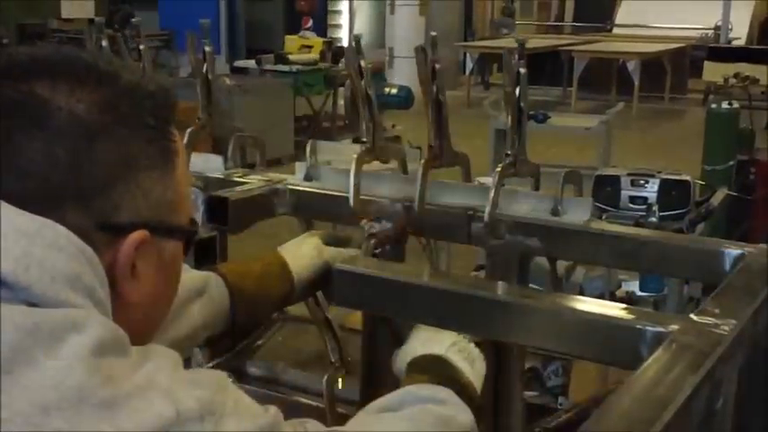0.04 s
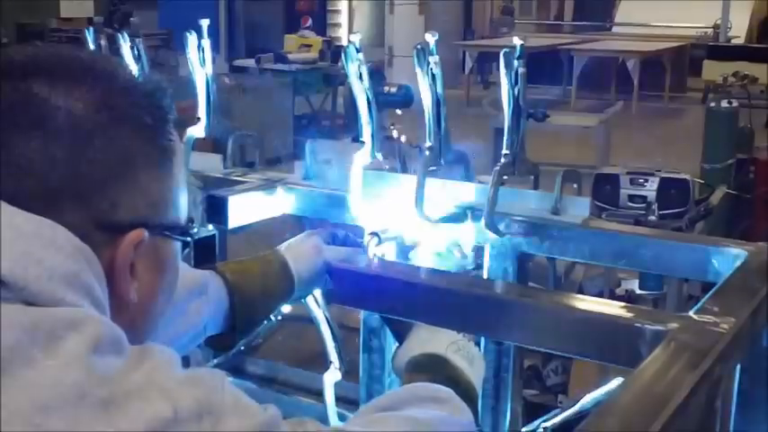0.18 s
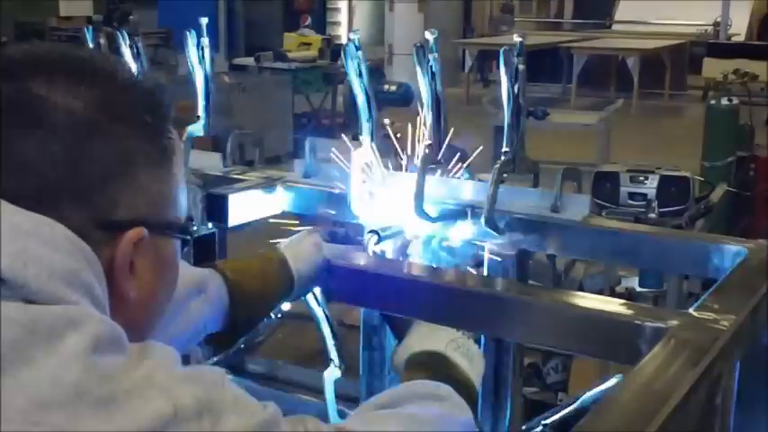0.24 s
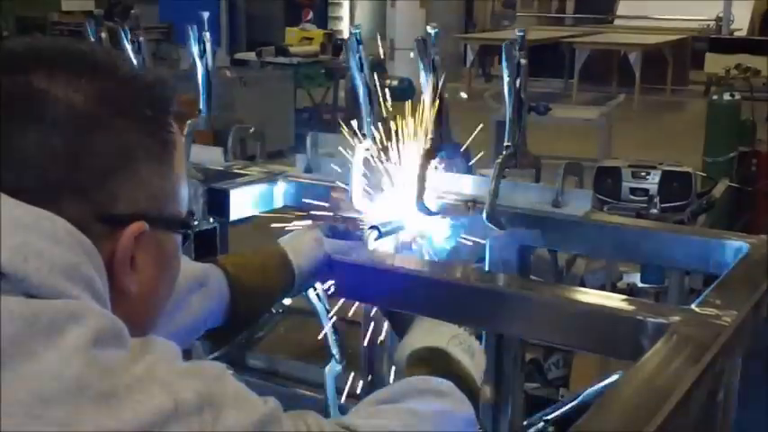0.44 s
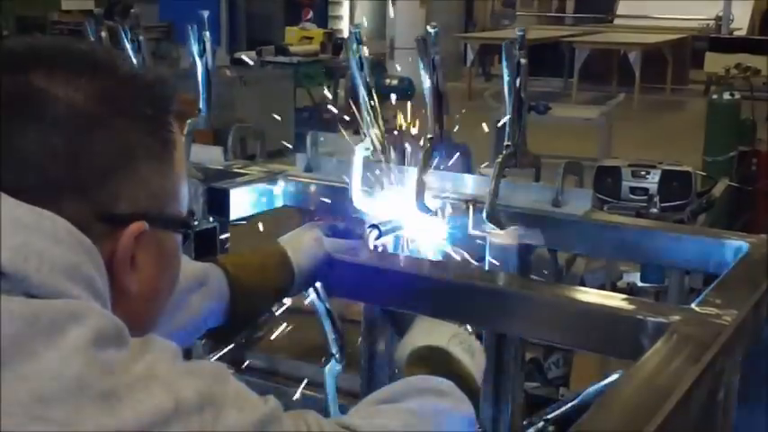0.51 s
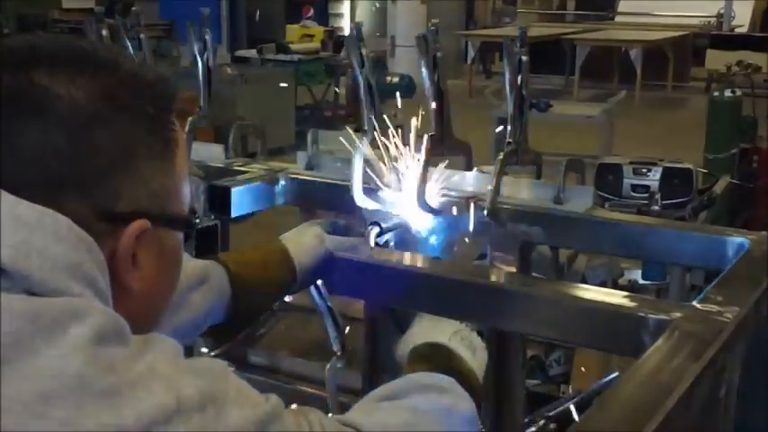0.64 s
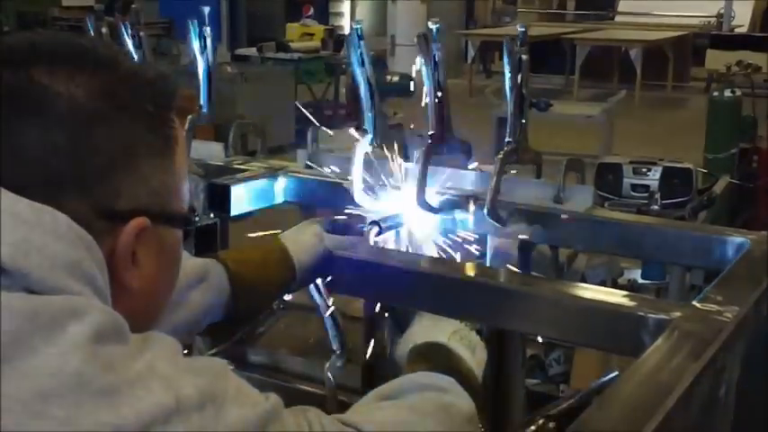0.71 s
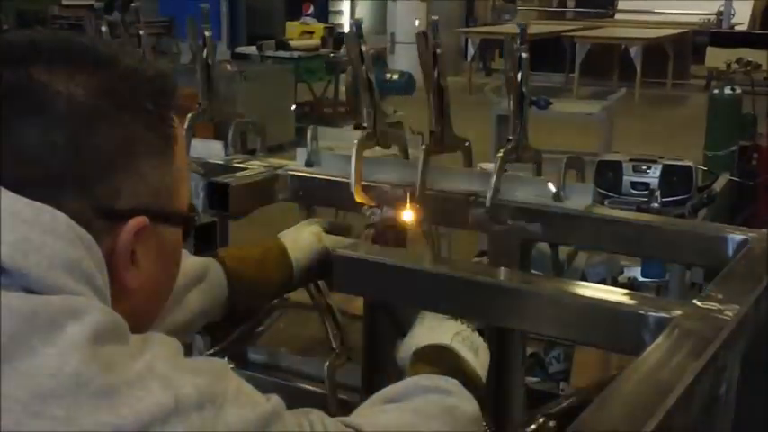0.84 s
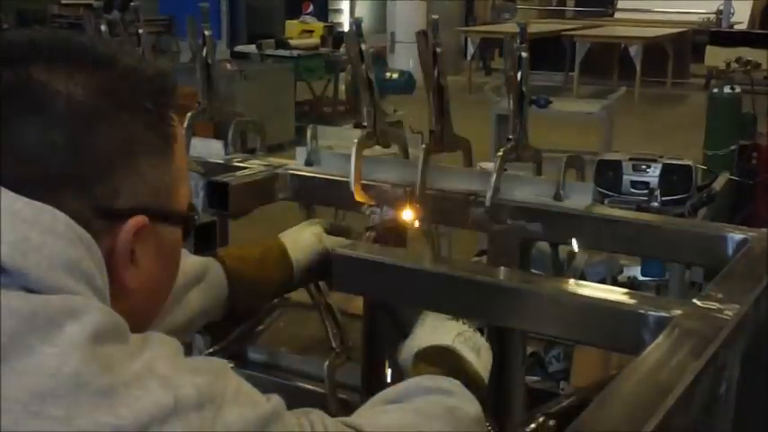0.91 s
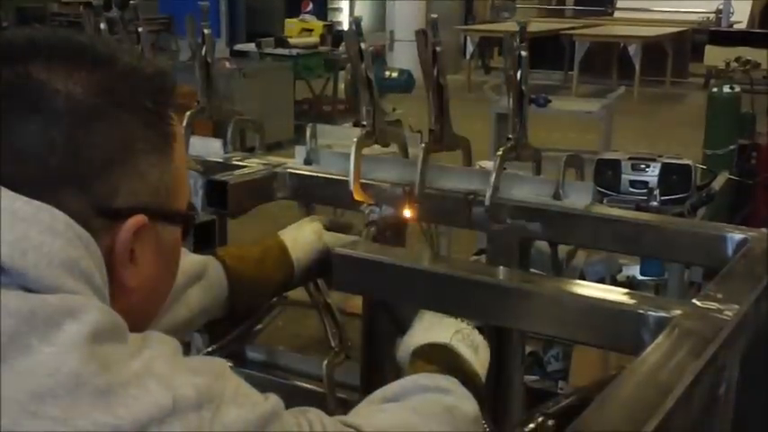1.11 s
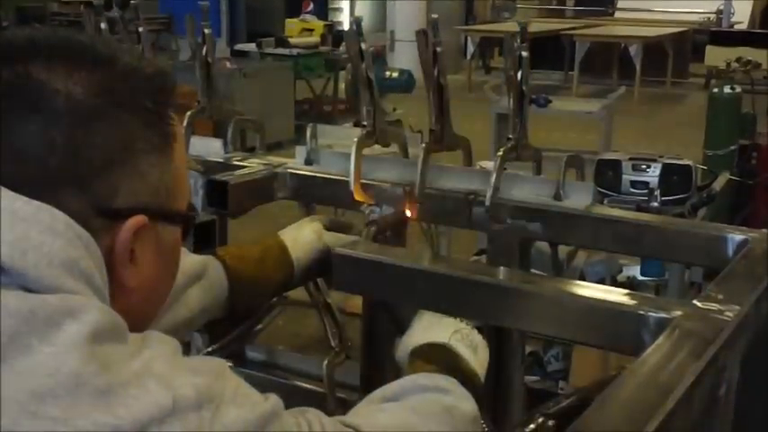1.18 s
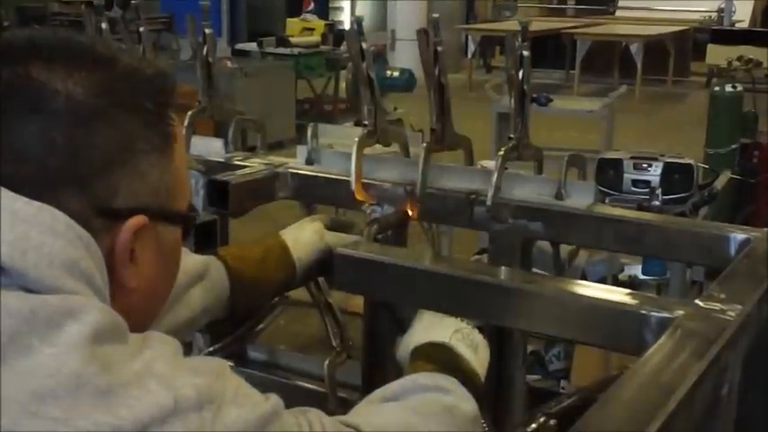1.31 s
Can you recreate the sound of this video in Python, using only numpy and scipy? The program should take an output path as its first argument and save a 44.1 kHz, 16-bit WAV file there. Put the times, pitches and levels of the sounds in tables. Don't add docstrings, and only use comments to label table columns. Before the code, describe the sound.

Close, harsh electric welding crackle with sharp snaps, fizzing droplets and dull metallic knocks from a steel frame; distant machinery drones before and after, with low transformer hum and a light hall echo.

```python
import sys
import numpy as np
from scipy import signal
from scipy.fft import irfft
from scipy.io import wavfile
from scipy.ndimage import uniform_filter1d

SR = 44100
rng = np.random.default_rng(int(sys.argv[2]) if len(sys.argv) > 2 else 0)


def volts_from_decibels(level):
    exponent = np.asarray(level, float) / 20
    return 10 ** exponent


def generate_wav(sig):
    pcm = np.round(np.clip(np.atleast_2d(sig).T, -1, 1) * 32767).astype(np.int16)
    wavfile.write(sys.argv[1], SR, pcm)


N = 59535


def evened(x):
    return x / np.sqrt(np.mean(x ** 2) + 1e-20)


def read(points, hz):
    f, value = np.transpose(points)
    return np.interp(np.log(hz + 1), np.log(f + 1), value)


def causal(db):
    log = np.log(volts_from_decibels(np.maximum(db, -100)))
    spectrum = np.exp(np.conj(signal.hilbert(np.r_[log, log[-2:0:-1]])))
    return np.fft.ifft(spectrum).real[:2048]


def rings(modes):
    t = np.arange(8000) / SR
    return sum(volts_from_decibels(db - 60 * t / t60) * np.sin(2 * np.pi * hz * t) for hz, db, t60 in modes)


def spikes(s, db):
    return np.bincount(np.round(s * SR).astype(int), volts_from_decibels(db), N)[:N]


def drone():
    # pitch_hz, level_db (per Hz)
    drone_colour = [(25, -11.5), (110, -6), (500, -8.5), (850, -5), (1400, -11.5), (1900, -18.5),
                    (3500, -23), (10400, -46)]
    # pitch_hz, width_hz, level_db
    favoured_bands = [(840, 41, 4), (1380, 54, 1.5), (2740, 140, 4.5)]
    # time_s, level_db
    machine_swell = [
        (0, -2.5),
        (.15, -0.5),
        (.3, 3.5),
        (.5, 2),
        (.9, -2.5),
        (1.15, -2),
        (1.3, 0),
        (1.35, 1.5),
    ]
    drone_db, patchy_db = -38.5, 1.5
    hz = np.fft.rfftfreq(1024, 1 / SR)
    real, imag, patches = rng.standard_normal((N // 256 + 5, 513, 3)).T
    patches = uniform_filter1d(patches, size=8, axis=0)
    patches = evened(uniform_filter1d(patches, size=10, axis=1))
    bands = sum(db * np.exp(-((hz - top_hz) / width) ** 2) for top_hz, width, db in favoured_bands)
    level_db = (read(drone_colour, hz) + bands)[:, None] + patchy_db * patches
    noise = signal.istft((real + 1j * imag) * volts_from_decibels(level_db), nperseg=1024, noverlap=768)[1][:N]
    swell_db = np.interp(np.arange(N) / SR, *np.transpose(machine_swell))
    return volts_from_decibels(drone_db + swell_db) * evened(noise)


def hum():
    # time_s, level_db
    hum_level = [(0, -53.5), (.2, -49.5), (.235, -48.5), (.27, -46), (.38, -46), (.43, -72), (.49, -45),
                 (.55, -75), (.87, -58), (.96, -53), (1.35, -52)]
    hum_hz, width_hz = 120.2, 9.4
    t = np.arange(N) / SR
    pole = np.exp(-np.pi * width_hz / SR)
    waver = signal.lfilter([1], [1, -pole], rng.standard_normal(N) + 1j * rng.standard_normal(N))
    tone = ((2.4 + waver / np.std(waver)) * np.exp(2j * np.pi * hum_hz * t)).real
    return volts_from_decibels(np.interp(t, *np.transpose(hum_level))) * evened(tone)


def hall(x):
    # pitch_hz, t60_s
    hall_decay = [(200, 0.86), (1000, 0.2), (4000, 0.76), (10000, 0.49)]
    taps = np.zeros(SR)
    at = np.arange(260, SR - 20, 20)
    taps[at + rng.integers(0, 20, len(at))] = rng.choice([-1., 1.], len(at))
    hz, t, z = signal.stft(taps, SR, nperseg=256)
    decay_db = -60 * t / read(hall_decay, hz)[:, None]
    tail = signal.istft(z * volts_from_decibels(decay_db), SR, nperseg=256)[1]
    return signal.fftconvolve(x, tail / np.linalg.norm(tail))[:N]


def stubs():
    # start_s, pitch_hz, level_db, t60_s
    knocks = [
        (.236, 213, -30, 0.067),
        (.238, 121, -29.5, 0.13),
        (.377, 557, -16.5, 0.037),
        (.377, 1055, -19, 0.029),
        (.49, 106, -34.5, 0.11),
        (.531, 503, -28, 0.038),
    ]
    out = np.zeros(N)
    for start, hz, db, t60 in knocks:
        hit = spikes(np.array([start]), [0])
        out += signal.oaconvolve(hit, rings([(hz, db, t60)]))[:N]
    return out


def bounces():
    # delay_ms, pressure_share
    reflections = [(0, 1), (.17, .55), (.32, .35), (.42, -.3), (.51, -.4), (.71, -.3), (.98, .4),
                   (1.13, .3), (1.28, .5), (1.37, -.35), (1.61, -.5), (2.52, .3), (2.93, -.2), (4.3, -.2)]
    ms, share = np.transpose(reflections)
    delayed = np.sinc(np.arange(400) - ms[:, None] * SR / 1000)
    return (share[:, None] * delayed).sum(0)


def thump():
    # pitch_hz, level_db, t60_s
    tube_modes = [(259, -4.5, 0.058), (580.5, 2.5, 0.08), (831.2, 5, 0.11), (926, -4.5, 0.19),
                  (1115, -41, 0.066), (126, -5, 0.049)]
    # pitch_hz, level_db
    push_colour = [(60, -10), (200, 5), (600, -2), (1100, -3.5), (1700, 1), (2600, -1.5), (4000, -52)]
    thump_db, ring_db, rise_s, from_hz = 1, -11.5, 0.0016, 157
    push = signal.oaconvolve(bounces(), causal(read(push_colour, np.fft.rfftfreq(4096, 1 / SR))))
    out = volts_from_decibels(ring_db) * rings(tube_modes)
    out *= 1 - np.exp(-np.arange(len(out)) / SR / rise_s)
    out[:len(push)] += push / np.sqrt(np.mean(push[:130] ** 2))
    return volts_from_decibels(thump_db) * signal.sosfilt(signal.butter(2, from_hz, "high", fs=SR, output="sos"), out)


def snap():
    # pitch_hz, level_db, t60_s
    steel_modes = [(3270, -35, 0.038), (3860, -49, 0.077), (4658, -23, 0.0094), (5260, -45, 0.045),
                   (6060, -29, 0.013), (7154, -19, 0.017), (7450, -20.5, 0.01), (8455, -28, 0.017),
                   (10210, -11.5, 0.0059)]
    # pitch_hz, level_db
    spike_colour = [(300, -27), (1500, -11.5), (2400, -21.5), (3300, -2.5), (5000, 0), (7200, -3),
                    (9000, 3.5), (10300, -1)]
    snap_db = 3
    out = rings(steel_modes)
    out[:400] += bounces()
    spike = irfft(volts_from_decibels(read(spike_colour, np.fft.rfftfreq(4096, 1 / SR))))
    spike = np.roll(spike, 64)[:129] * np.hanning(129)
    out = signal.oaconvolve(out, spike)
    return volts_from_decibels(snap_db) * out / np.sqrt(np.mean(out[64:154] ** 2))


def sputter():
    # time_s, level_db
    arc_current = [(.231, -94), (0.236, -36.5), (.26, -50), (.355, -51), (0.371, -35.5), (0.421, -36.5),
                   (.44, -82), (0.461, -61), (0.47, -29), (.495, -49), (.515, -42), (.535, -33.5),
                   (.64, -46), (.75, -37.5), (0.799, -37.5), (0.864, -39), (.878, -64), (.97, -82)]
    pops_per_s, spread_db, hiss_db = 2500, 3, -10.5
    size_db = spread_db * np.minimum(rng.exponential(1, N), 4)
    small = evened(volts_from_decibels(size_db) * (rng.random(N) < pops_per_s / SR))
    small = small + volts_from_decibels(hiss_db) * rng.standard_normal(N)
    current = volts_from_decibels(np.interp(np.arange(N) / SR, *np.transpose(arc_current)))
    return current * (small - small.mean()) / 10


def droplets():
    # start_s, length_s, level_db
    fizzing = [
        (0.3684, 0.0063, -26),
        (.386, 0.0016, -36),
        (0.4698, 0.013, -25),
        (0.4814, .004, -31),
        (0.491, 0.0017, -25),
        (0.631, 0.0027, -35),
        (0.825, 0.0032, -35.5),
        (.844, .003, -34),
    ]
    t = np.arange(N) / SR
    swell = sum(volts_from_decibels(db - 19) * np.sin(np.pi * np.clip((t - start) / length, 0, 1))
                for start, length, db in fizzing)
    return swell * rng.standard_normal(N)


def puffs(s, db):
    scatter_db, scatter_t60, lag_s = -8, .016, .0012
    decay = volts_from_decibels(-60 / scatter_t60 / SR)
    puff = signal.lfilter([1], [1, -decay], spikes(s + lag_s, db + scatter_db - 20))
    return puff * rng.standard_normal(N)


def arc():
    # start_s, snap_db, thump_db (re snap)
    arc_pops = [(0.2331, -23, -6), (0.3764, -13, -2), (0.3864, -28, -11), (0.4006, -15, -10),
                (0.4106, -20, -5), (0.4631, -25, -14), (0.4717, -22, -5), (0.4777, -26, -5),
                (0.4889, -23, -2), (0.529, -15, -9), (0.5417, -23, -3), (0.5566, -19, -9),
                (0.5684, -29, -6), (0.5772, -33, 5), (0.5855, -20, -12), (0.595, -30, -5),
                (0.6025, -28, -1), (0.6117, -22, -12), (0.6204, -33, 0), (0.6275, -31, -2),
                (0.6346, -31, -1), (0.6508, -25, -11),
                (0.6608, -30, -1), (0.6757, -27, -9), (0.6861, -31, -7), (0.6948, -22, -8),
               (0.7004, -30, -18), (0.7102, -26, -11), (0.7207, -22, -9), (0.7323, -19, -22),
               (0.7442, -27, -9), (0.7529, -26, -6), (0.7685, -31, -5), (0.7769, -25, -4),
               (0.7878, -29, -11), (0.7938, -34, 2), (0.8031, -29, -16), (0.8115, -29, -12),
               (0.822, -31, -12), (0.8337, -28, -4), (0.844, -29, -2), (0.854, -32, -3), (0.8604, -28, -6)]
    sputter_thump_db, fizz_thump_db = -3, -12.5
    s, db, thump_db = np.array(arc_pops).T
    small, fizz = sputter(), droplets()
    high = spikes(s, db) + small + fizz + puffs(s, db)
    low = spikes(s, db + thump_db) + volts_from_decibels(sputter_thump_db) * small + volts_from_decibels(fizz_thump_db) * fizz
    high = signal.oaconvolve(high, snap())[64:N + 64]
    return high + signal.oaconvolve(low, thump())[:N]


def scene():
    hall_db = -14
    near = arc() + stubs()
    return (near + volts_from_decibels(hall_db) * hall(near) + drone() + hum())[None]


def roll_off(x):
    return signal.sosfilt(signal.butter(12, 11990, fs=SR, output="sos"), x)


def record(dry):
    notch_hz, notch_width_hz, notch_db, edge_hz = 7880, 220, -13, 10995
    duck_from_db, duck_share, duck_back_db_per_s, limit = -21.5, .15, 10, 1.3
    hz = np.fft.rfftfreq(4096, 1 / SR)
    notch = notch_db * np.exp(-((hz - notch_hz) / notch_width_hz) ** 2)
    bass_cut = -3 * (30 / (hz + 1)) ** 2
    x = signal.oaconvolve(dry[0], causal(notch + bass_cut))[:N]
    power_db = 10 * np.log10(abs(uniform_filter1d(x ** 2, size=400)) + 1e-12)
    back = np.arange(N) * duck_back_db_per_s / SR
    held_db = np.maximum.accumulate(power_db + back) - back
    over_db = np.maximum(held_db - duck_from_db, 0)
    x = x / volts_from_decibels(duck_share * uniform_filter1d(over_db, size=400, origin=199))
    x = limit * np.tanh(x / limit)
    x = signal.oaconvolve(x, signal.firwin(151, edge_hz, window=("kaiser", 7), fs=SR), "same")
    return roll_off(x[None])


dry = scene()
out = record(dry)
generate_wav(out)
```